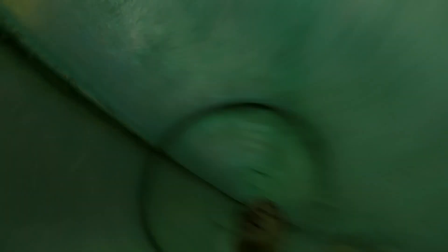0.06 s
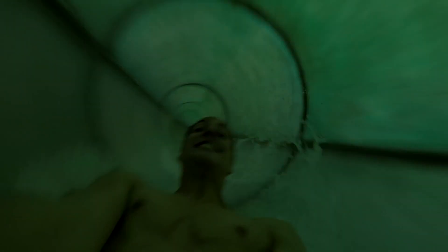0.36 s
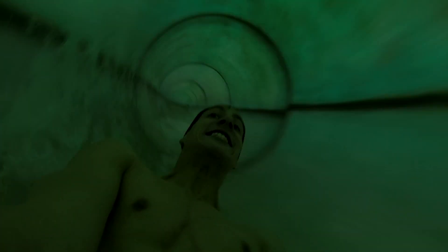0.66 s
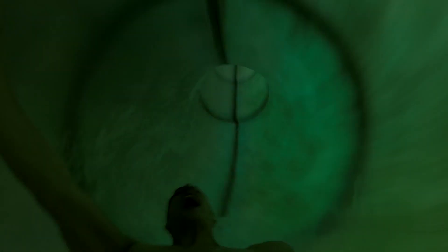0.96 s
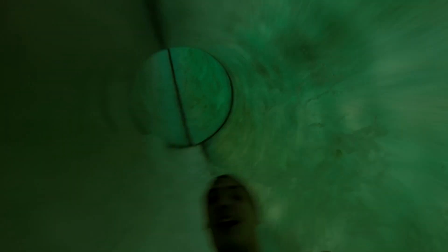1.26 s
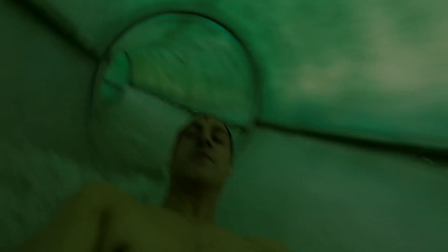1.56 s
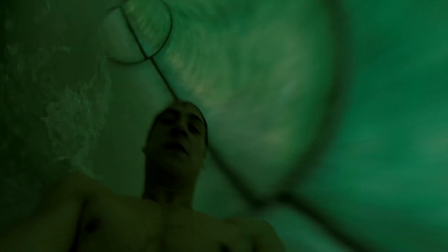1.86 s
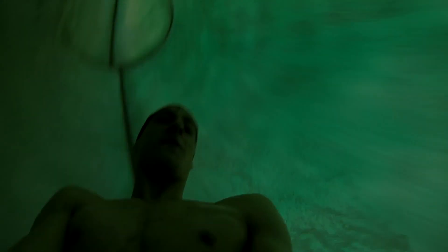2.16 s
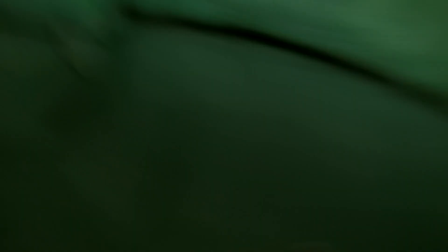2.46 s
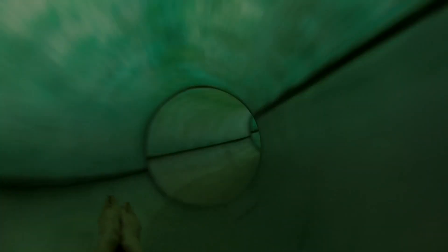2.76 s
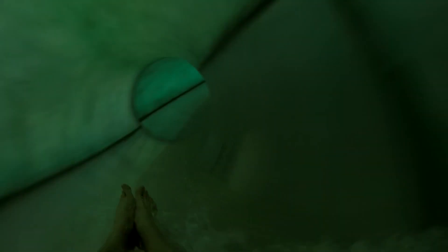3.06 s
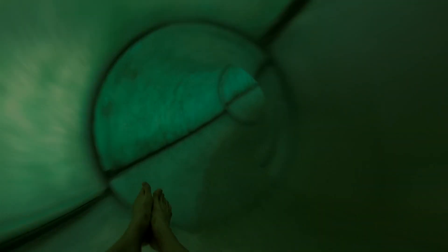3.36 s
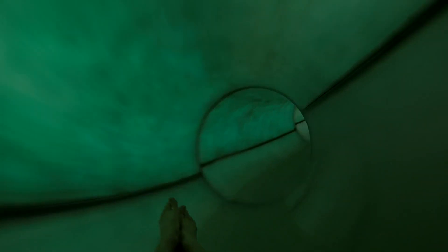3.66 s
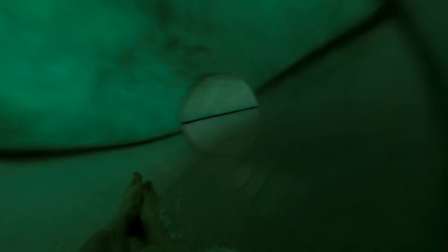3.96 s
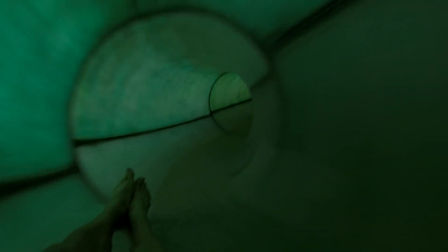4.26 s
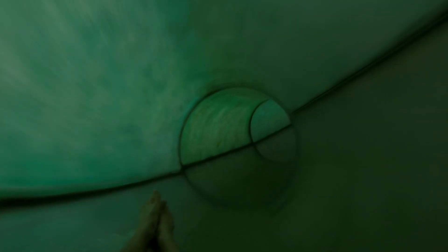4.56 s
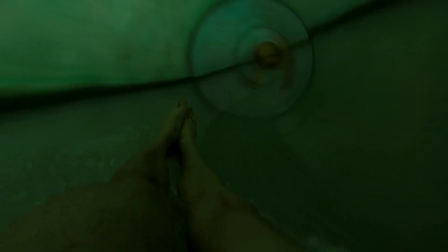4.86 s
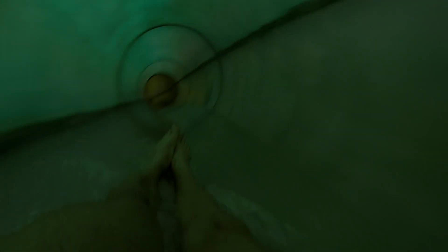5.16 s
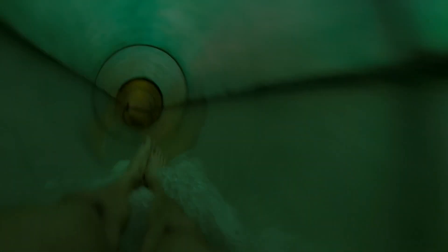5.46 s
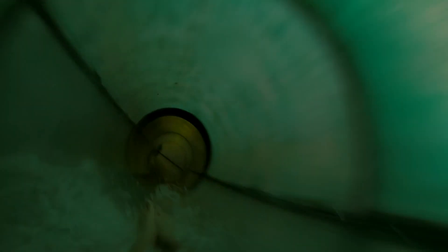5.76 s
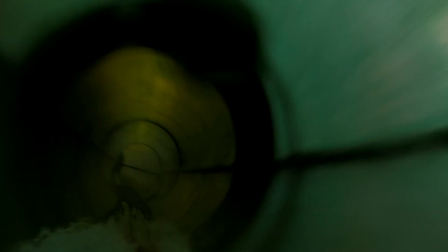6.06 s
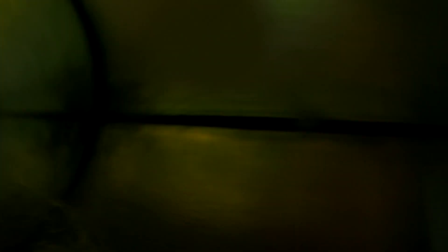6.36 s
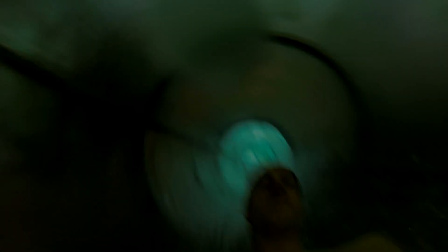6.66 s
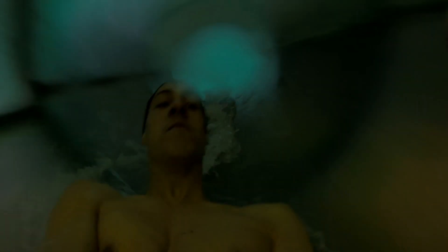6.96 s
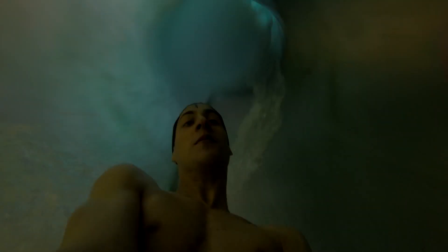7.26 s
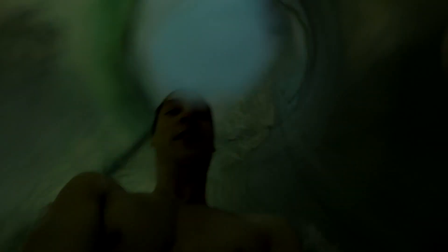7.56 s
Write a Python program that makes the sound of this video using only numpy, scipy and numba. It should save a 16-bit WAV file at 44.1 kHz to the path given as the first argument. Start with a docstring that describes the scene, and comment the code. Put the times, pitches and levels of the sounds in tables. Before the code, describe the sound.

Water hisses, churns and slaps against a close microphone sliding down an enclosed water slide, with a whistling ring and dull thumps.

```python
"""Inside an enclosed water slide, heard from a waterproof camera in a rider's hand.
Spray hisses and rings a whistling resonance of the wet housing, water churns, slaps and spatters on it,
air buffets it, and the tube booms behind. Jolts along the way send pressure surges into the camera's
limiter, and the strong ones duck everything for a moment."""
import sys
import numpy as np
from scipy import signal
from scipy.fft import rfft, irfft
from scipy.io import wavfile
from scipy.ndimage import uniform_filter1d
from numba import njit

SR = 44100
rng = np.random.default_rng(int(sys.argv[2]) if len(sys.argv) > 2 else 0)


def transcribe(signal):
    """Save signal, clipped to [-1, 1], as a 16-bit WAV file at the path in sys.argv[1]."""
    frames = np.atleast_2d(signal).T
    limited = np.clip(frames, -1, 1)
    pcm = np.round(limited * 32767).astype(np.int16)
    wavfile.write(sys.argv[1], SR, pcm)


N = 340893

# pitch of the housing's whistle: t/s, f/Hz
HOUSING_PITCH = [(0, 1500), (.3, 1505), (2.3, 1542), (2.65, 1496), (3.7, 1536), (4.4, 1447), (6.1, 1475),
                 (6.55, 1550), (7.73, 1580)]
# housing resonances: multiple of the pitch, base width/Hz, level/dB
HOUSING_MODES = [(1, 530, 3.5), (2.05, 1210, -19), (3.35, 1300, -34.5), (4.4, 1410, -35.5)]
# water film damping the housing: t/s, width factor, trim of the upper resonances/dB
WATER_FILM = [(0, 0.71, 0), (.5, 0.56, -1.5), (.7, 0.67, 6), (.95, 0.68, 0), (2.3, 0.6, -0.5),
              (2.9, 1.06, 3), (4.3, 0.91, -0.5), (5.8, 1.05, -36), (6.7, 1.25, -1.5), (7.7, 1.23, 0)]


def whistle(waver=0.017, over_flow_db=13, loss_db_per_doubling=-6.5):
    """Fine spray rings the housing in uneven beats; the shifting film bends the pitch and damps it."""
    hz = curves(HOUSING_PITCH)[0] * (1 + waver * walk(25))
    widening, upper_db = curves(WATER_FILM)
    impacts = drops(rate=4000, spread_db=-1.5)
    modes = 0
    for order, (multiple, width, db) in enumerate(HOUSING_MODES):
        ring = bandpass(impacts, multiple * hz, width * widening, passes=3)
        modes += ring * undb(db + upper_db * (order > 0))
    tone = unit(modes / np.sqrt(widening)) * undb(0.57 * walk(45))
    ring_db = over_flow_db + loss_db_per_doubling * np.log2(widening)
    for s, half_s, _, db in THROWN_SHEETS:
        ring_db += db * plateau(s, half_s)
    return tone * undb(ring_db)


# tone of the spray: f/Hz, level/dB
SPRAY_EQ = [(1300, 1), (1900, -3.5), (2350, -3), (2900, -0.5), (3500, -0.5), (4050, -2.5), (4600, -10),
            (5300, -8.5), (6200, -13.5), (7200, -14), (10000, -19), (14500, -29)]


def spray(ahead):
    """Dense tiny drops thrown up by the rider merge into a flickering hiss."""
    hiss = colour(drops(rate=16000, spread_db=0.5), SPRAY_EQ)
    return hiss * undb(2.5 + 0.73 * ahead + 0.91 * walk(30))


# tone of the churning water: f/Hz, level/dB
CHURN_EQ = [(150, 7), (280, 0), (480, -2), (680, -1.5), (850, -4), (1120, -8), (1450, 0), (2200, -11.5)]


def churn(ahead):
    """Sparser, darker splashes give the hiss its body."""
    body = colour(drops(rate=2500, spread_db=2), CHURN_EQ)
    return body * undb(1 + 0.6 * ahead + 1.6 * walk(21.89))


# fader ride of the water passing the camera: t/s, level/dB
FLOW_RIDE = [(0, -51), (.2, -49), (.45, -44.5), (.86, -47.5), (.97, -51.5), (1.75, -47), (2.1, -51),
             (2.75, -58), (2.86, -49.5), (3.65, -51.5), (3.95, -49), (4.25, -53), (5.2, -55.5), (5.82, -46),
             (5.97, -55), (6.85, -47.5), (7.1, -49.5), (7.73, -49.5)]
# sheets of water thrown over the camera: t/s, half length/s, flow boost/dB, whistle boost/dB
THROWN_SHEETS = [(0.1, 0.052, 3, 0.5), (0.455, 0.0085, -1, 1.5), (0.752, 0.094, 2.5, -1),
                 (0.827, 0.053, 1, 1), (1.018, .03, 6, -5.5), (1.27, 0.039, 3.5, 0),
                 (1.337, 0.017, 11.5, -3.5), (1.477, 0.052, 3, -6.5), (1.583, 0.042, 3.5, -4),
                 (1.783, 0.019, -0.5, 2), (2.212, 0.038, 1.5, 3.5), (2.548, 0.083, 5.5, 1.5),
                 (4.392, 0.041, 0, 3.5), (5.318, 0.044, 4, 1), (5.536, 0.026, 4, 2), (5.7, 0.049, -0.5, 1),
                 (7.598, 0.019, 3.5, 0)]


def flow(pile_db=2.5, pile_s=0.054, drop_s=0.0029):
    """Gain of the passing water: it shifts with each thrown sheet and piles up ahead of each jolt."""
    level_db, = curves(FLOW_RIDE)
    for s, half_s, db, _ in THROWN_SHEETS:
        level_db += db * plateau(s, half_s)
    for s, db, _ in JOLT_HITS:
        level_db += min(1, undb(db)) * pile_db * swell(s, pile_s, drop_s)
    return undb(level_db)


# jolts of the ride: t/s, level/dB, rise/ms
JOLT_HITS = [(.075, -9, 1.3), (0.123, -5, 1.8), (0.246, -12, 3), (0.495, -7.5, 2.35), (.694, -10.5, 1),
             (.725, -10, 4.6), (.903, -5, 2.7), (1.055, -6.5, 1.38), (1.303, .5, 1.35), (1.49, -3, 2.1),
             (1.649, -5, 2.3), (1.808, -7, 2.3), (2.268, -7, 1.3), (2.343, -9.5, 2.9), (2.478, -6.5, 3.3),
             (2.601, -5.5, 3.8), (2.682, -10.5, 1.7), (3.173, -9.5, 2.8), (3.606, -5.5, 3),
             (4.046, -8, 2.8), (4.413, -2.5, 3.2), (4.617, -3, 5.6), (4.7, -18, 1.3), (4.934, 1, 2.1),
             (5.217, 3.5, 1.8), (5.403, -5, 11.2), (5.557, -1.5, 2.5), (5.89, -3, 2.8), (6.222, -0.5, 2.4),
             (6.519, -2.5, 1.47), (6.569, -0.5, 2.6), (6.776, -9.5, 4), (6.955, 6, 1.64), (7.38, -9, 3),
             (7.544, -9, 3)]


def jolts(rebound=0.22, rebound_lag=1.66, rebound_width=1.75):
    """Each jolt thumps: one smooth surge of pressure, milliseconds wide, and a softer swing back."""
    out, t = np.zeros(N), np.arange(N) / SR
    for s, db, rise_ms in JOLT_HITS:
        near = np.abs(t - s) < .1
        rises = (t[near] - s) * 1000 / rise_ms
        surge = 1 / np.cosh(rises)
        swing_back = rebound / np.cosh((rises - rebound_lag) / rebound_width)
        out[near] += undb(db) * (surge - swing_back)
    return out


# slaps and glugs on the housing: t/s, level/dB, f/Hz, ring/cycles
SLAP_HITS = [(.027, -22, 776, 0.4), (.064, -19.5, 980, .45), (0.102, -15.5, 1330, .3),
             (0.366, -40, 1550, 2.5), (1.042, -18.5, 1600, 0.87), (1.046, -26, 380, 0.32),
             (1.396, -20, 1090, 0.4), (1.697, -19, 820, 0.74), (2.262, -21, 840, 0.44),
             (2.313, -20.5, 1910, 0.46), (2.461, -17.5, 1300, 0.26), (2.67, -20, 1430, 0.46),
             (3.077, -15.5, 1560, 1.1), (3.091, -18, 1620, 0.92), (3.148, -17.5, 1450, 0.56),
             (3.45, -16.5, 1560, .5), (3.554, -18, 1630, .85), (3.965, -31, 1490, .5),
             (3.9689, -20.5, 660, 0.82), (3.972, -19, 190, 0.52), (4.924, -17.5, 109, 0.96),
             (5.337, -27.5, 1150, 3.9), (6.106, -32.5, 930, 0.95), (6.583, -25, 3300, .4),
             (6.584, -7, 1714, 0.95), (6.771, -18.5, 890, 0.58), (6.95, -21.5, 417, 0.37),
             (7.082, -17.5, 900, 0.13), (7.373, -30.5, 700, .35), (7.59, -28, 810, 0.89)]


def slaps(push_ms=0.86):
    """A slug of water hits the housing: a very short ring on top of a dull push."""
    out, t = np.zeros(N), np.arange(N) / SR
    for s, db, hz, cycles in SLAP_HITS:
        near = np.abs(t - s) < .05
        age = t[near] - s
        ring = np.cos(2 * np.pi * hz * age) / np.cosh(hz * age / cycles)
        weight = min(1, (900 / hz) ** 2)  # big slugs ring lower and push harder
        push = weight / np.cosh(age * 1000 / push_ms)
        out[near] -= undb(db) * (ring + push)
    return out


# showers of drops on the housing: t/s, length/s, level/dB
SHOWERS = [(1.364, .033, -34), (3.041, 0.03, -38.5), (3.064, 0.056, -32.5), (3.116, 0.044, -36.5),
           (3.28, 0.033, -46), (3.389, 0.082, -35), (3.537, 0.036, -36), (3.944, 0.039, -32.5),
           (4.026, 0.028, -46), (6.714, 0.081, -42.5)]
# tone of a drop's splat: f/Hz, level/dB
SPLAT_EQ = [(130, 11), (300, -2), (700, 4), (1100, 0), (1600, 2), (2100, -24), (3000, -12), (6000, -31)]


def spatter(smear_ms=0.97, crackle_db=-7):
    """Short showers of large drops burst into splats, and the biggest ring the housing as a crackle."""
    t = np.arange(256) / SR
    splat = rng.standard_normal(len(t)) * np.exp(-t * 1000 / smear_ms)
    smear = np.exp(1j * np.angle(rfft(splat, N)))  # phase only: spreads a drop without colouring it
    impacts = drops(rate=880, spread_db=-3.5)
    splats = colour(irfft(rfft(impacts) * smear, N), SPLAT_EQ)
    crackle = bandpass(drops(rate=400, spread_db=4.5), hz=1620, width_hz=830, passes=3)
    shower = splats + undb(crackle_db) * unit(crackle)
    out = np.zeros(N)
    for s, length, db in SHOWERS:
        i, n = int(s * SR), int(length * SR)
        out[i:i + n] += undb(db) * unit(shower[i:i + n] * signal.windows.tukey(n, .5))
    return out


# tone of the slow air pressure: f/Hz, level/dB
RUMBLE_EQ = [(8, -0.5), (18, 4.5), (35, 2.5), (55, -8), (85, -21.5), (150, -32.5), (300, -46)]
# tone of the quick buffeting: f/Hz, level/dB
BUFFET_EQ = [(40, -4.5), (80, 5.5), (130, -2.5), (200, -11.5), (320, -22), (600, -24)]


def wind(ahead, rumble_db=-23, back_db=-38.5, ahead_db=-52, stir_db=19, full_slap_db=-19):
    """Air heaves against the microphone and flutters in quick puffs, most around slaps and sheets."""
    stir = np.zeros(N)
    for s, db, _, _ in SLAP_HITS:
        strength = min(1, undb(db - full_slap_db))
        stir = np.maximum(stir, strength * swell(s, before_s=0.047, after_s=0.064))
    for s, half_s, _, _ in THROWN_SHEETS:
        stir = np.maximum(stir, 0.59 * plateau(s, half_s))
    flutter_db = back_db + (ahead_db - back_db) * ahead + stir_db * stir
    rumble = unit(colour(rng.standard_normal(N), RUMBLE_EQ) * undb(1.1 * walk(9)))
    puffs = colour(drops(rate=130, spread_db=3), BUFFET_EQ)
    return undb(rumble_db) * rumble + undb(flutter_db) * puffs


# the tube's cross modes: f/Hz, half width/Hz, level facing the rider/dB, level facing down the tube/dB
TUBE_MODES = [(408.5, 22, -6.5, -11.5), (584.4, 62, -10.5, -4.5), (1082, 220, -11, 4.5)]


def tube_boom(ahead):
    """Water noise rings the tube's cross modes: a hollow bed, brighter when facing down the tube."""
    boom = 0
    for hz, half_width, back_db, ahead_db in TUBE_MODES:
        mode = unit(bandpass(rng.standard_normal(N), hz, 2 * half_width, passes=2))
        boom += mode * undb(back_db + (ahead_db - back_db) * ahead)
    return boom


def undb(db):
    """Decibels to gain."""
    return 10 ** (np.asarray(db) / 20)


def unit(x):
    """Scale to rms 1."""
    return x / np.sqrt(np.mean(x ** 2) + 1e-18)


def curves(table):
    """The columns of a timed table as automation curves, sample by sample."""
    s, *columns = np.transpose(table)
    return [np.interp(np.arange(N) / SR, s, c) for c in columns]


def colour(x, points):
    """EQ a sound through (f/Hz, level/dB) points, rolling off past both ends; rms 1."""
    hz, db = np.transpose(points)
    log_f = np.log(np.arange(N // 2 + 1) * SR / N + 1)
    outside = np.abs(log_f - np.clip(log_f, np.log(hz[0]), np.log(hz[-1])))
    eq_db = np.interp(log_f, np.log(hz), db) - 20 * outside
    return unit(irfft(rfft(x) * undb(eq_db), N))


def walk(rate):
    """Random modulation: levels held 1 / rate s and slewed twice; rms 1."""
    hold = int(SR / rate)
    steps = np.repeat(rng.standard_normal(N // hold + 1), hold)
    return unit(uniform_filter1d(uniform_filter1d(steps, hold), hold)[:N])


def drops(rate, spread_db):
    """Random impacts, rate a second; a positive spread makes a few louder, a negative one softer."""
    hit = rng.random(N) < rate / SR
    size = undb(spread_db * np.minimum(rng.exponential(size=N), 5))
    return unit(hit * size * rng.standard_normal(N))


def swell(s, before_s, after_s):
    """An envelope that grows to 1 at time s and dies away after it."""
    t = np.arange(N) / SR - s
    return np.exp(-np.minimum(np.maximum(-t / before_s, t / after_s), 30))


def plateau(s, half_s):
    """A soft-edged envelope of height 1 around time s."""
    return 1 / (1 + ((np.arange(N) / SR - s) / half_s) ** 4)


def bandpass(x, hz, width_hz, passes):
    """Stacked band-passes, steady or swept; each pass steepens the skirts."""
    for _ in range(passes):
        x = svf(x, hz * np.ones(N), width_hz * np.ones(N))
    return x


@njit
def svf(x, hz, width):
    """State-variable band-pass with moving centre and width, gain 1 at the centre."""
    y, band_state, low_state = np.empty(len(x)), 0., 0.
    for i in range(len(x)):
        tuning, damping = np.tan(np.pi * hz[i] / SR), width[i] / hz[i]
        band = (band_state + tuning * (x[i] - low_state)) / (1 + tuning * (tuning + damping))
        band_state = 2 * band - band_state
        low_state += 2 * tuning * band
        y[i] = damping * band
    return y


@njit
def follow(x, attack, release):
    """Peak envelope: rises fast, sinks slowly."""
    y, peak = np.empty(len(x)), 0.
    for i in range(len(x)):
        peak += (abs(x[i]) - peak) * (attack if abs(x[i]) > peak else release)
        y[i] = peak
    return y


# where the camera points: t/s, aim (0 = at the rider, 1 = down the tube)
CAMERA_AIM = [(0, 0.38), (2.4, 0.26), (2.85, 0.97), (4.1, 0.85), (4.6, 0.77), (6.2, 0.64), (6.7, 0.21),
              (7.7, 0.027)]


def scene():
    """The mono mix at the camera; one flow drives whistle, spray, churn and tube together."""
    ahead, = curves(CAMERA_AIM)
    rush = flow() * (whistle() + spray(ahead) + churn(ahead) + tube_boom(ahead))
    return (rush + wind(ahead) + jolts() + slaps() + spatter())[None]


def record(dry, threshold_db=-12.5, attack_s=0.0013, release_s=0.097, glide_s=0.0016):
    """The limiter ducks smoothly under strong surges; the camera then cuts the deepest bass and the top."""
    peak = follow(dry[0], 1 / (1 + attack_s * SR), 1 / (1 + release_s * SR))
    gain = 1 / np.maximum(1, peak / undb(threshold_db))
    glide = int(glide_s * SR) + 1
    limited = dry * uniform_filter1d(uniform_filter1d(gain, glide), glide)
    low_cut = signal.butter(1, 14.6, "high", fs=SR, output="sos")
    high_cut = signal.ellip(10, .2, 80, 14900, fs=SR, output="sos")
    soft_ends = signal.windows.tukey(N, .001)
    return signal.sosfilt(high_cut, signal.sosfilt(low_cut, limited) * soft_ends)


dry = scene()
out = record(dry)
transcribe(out)
```